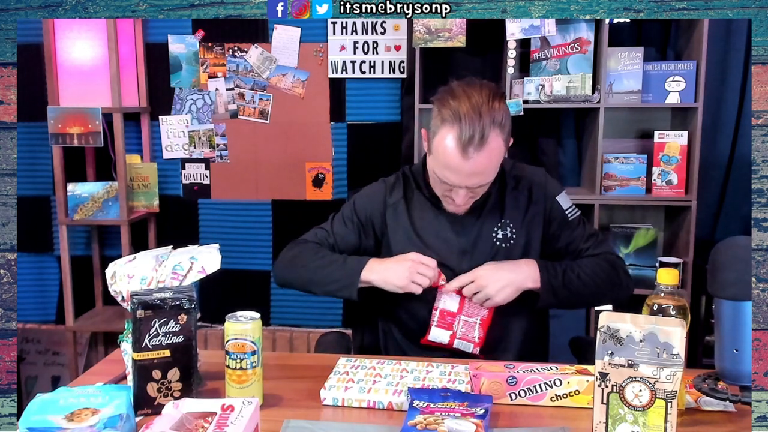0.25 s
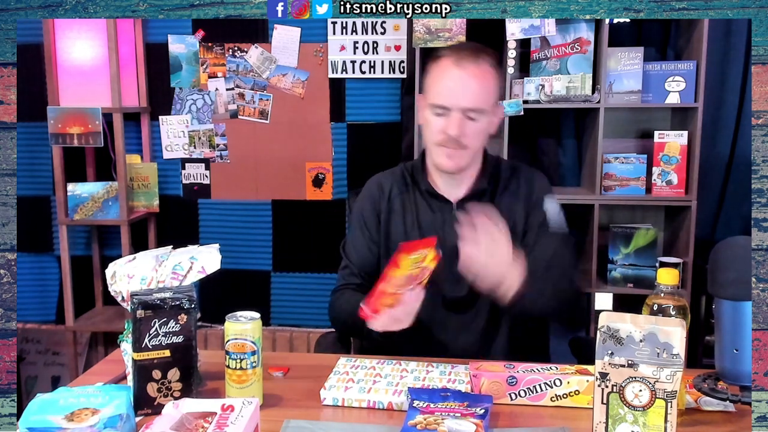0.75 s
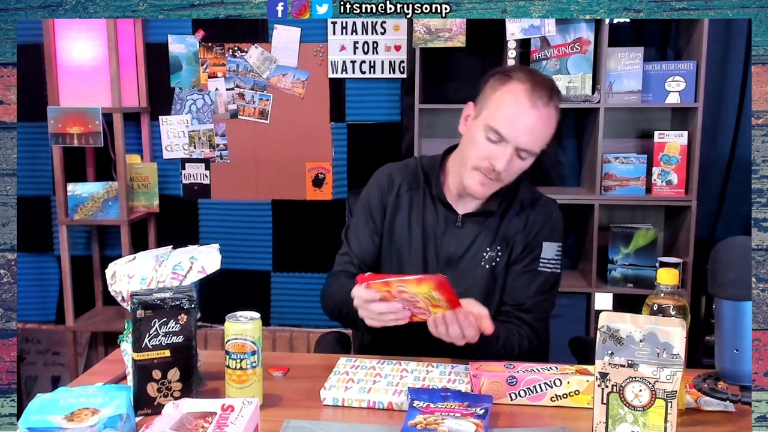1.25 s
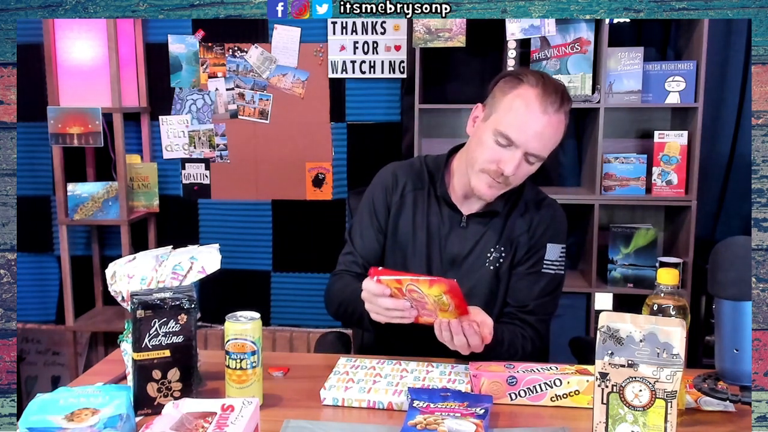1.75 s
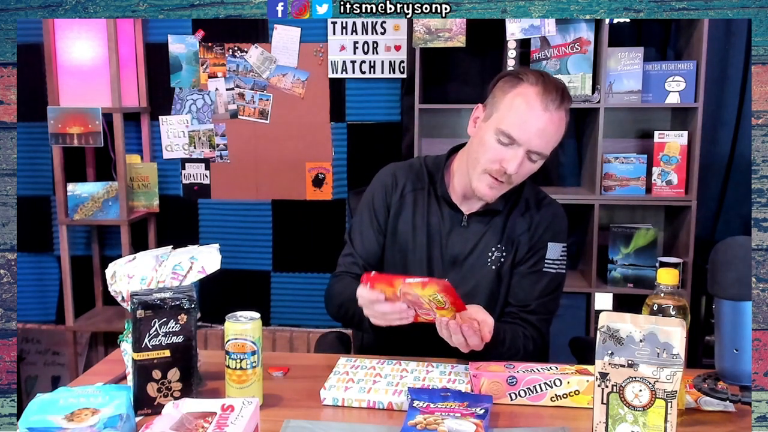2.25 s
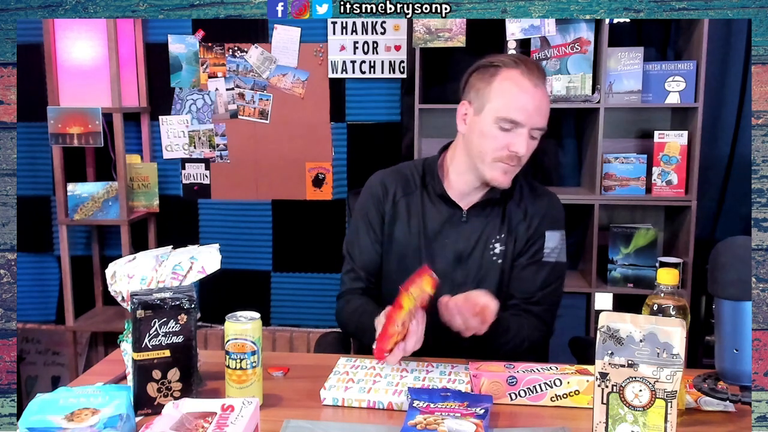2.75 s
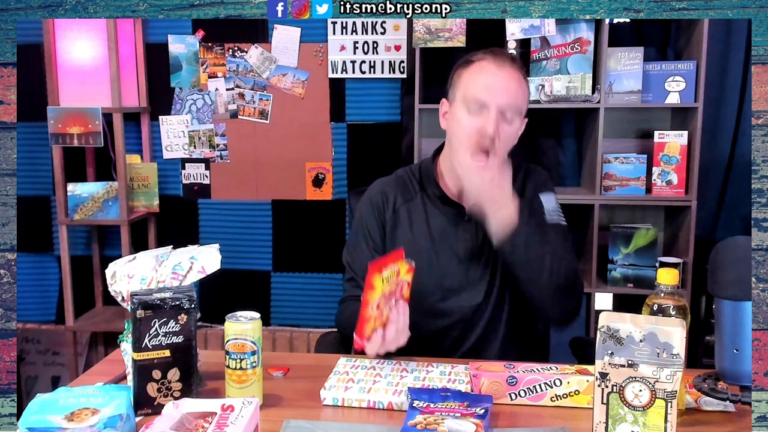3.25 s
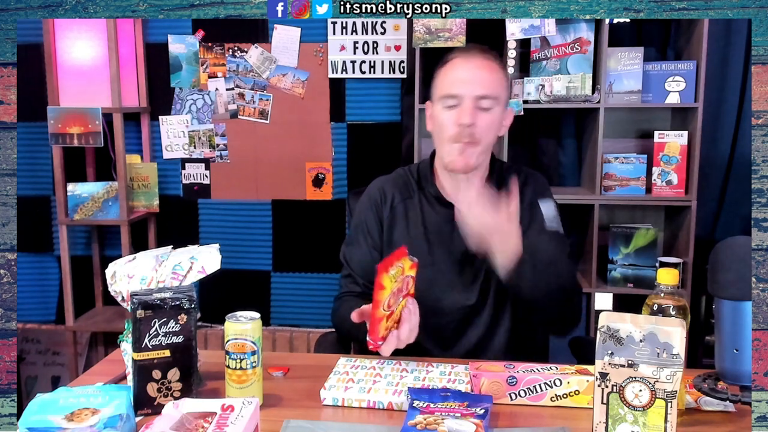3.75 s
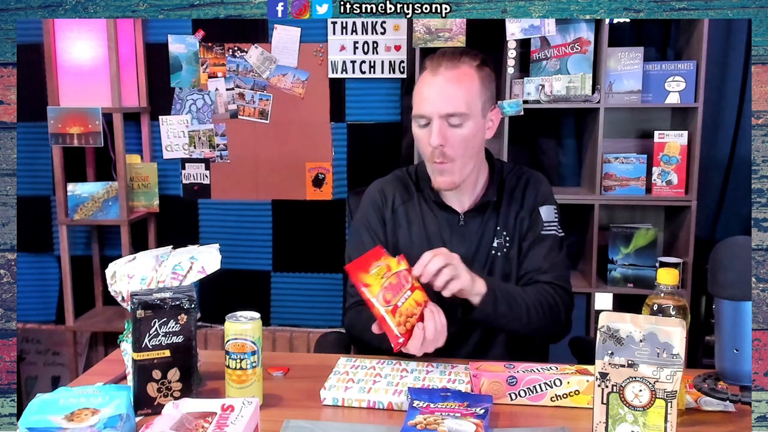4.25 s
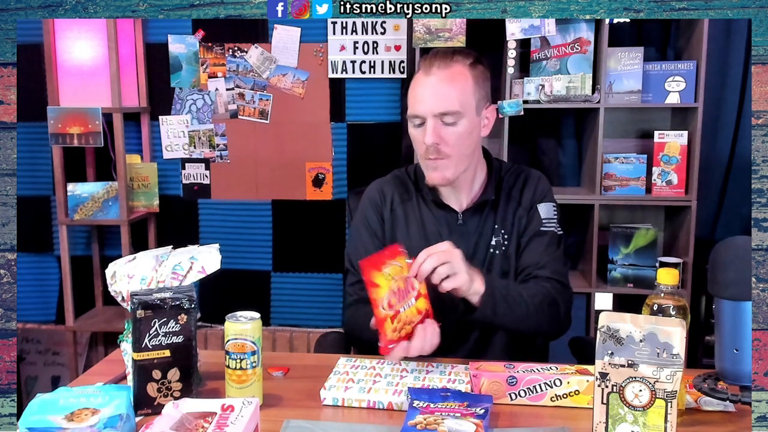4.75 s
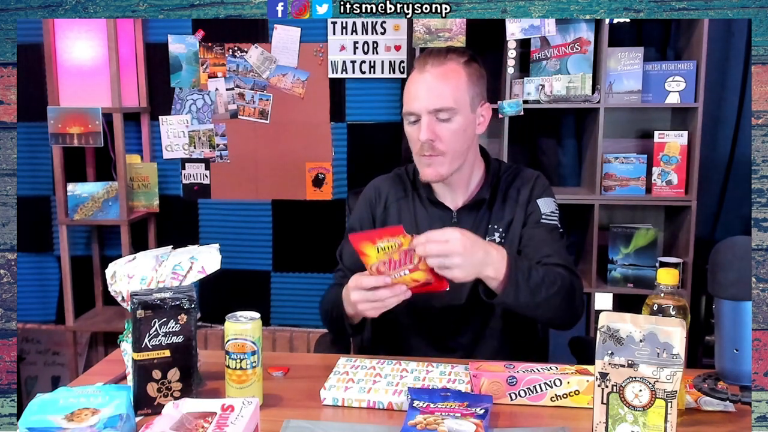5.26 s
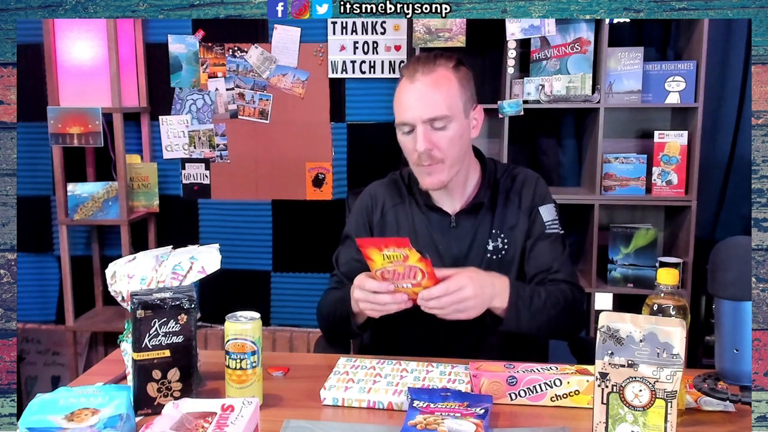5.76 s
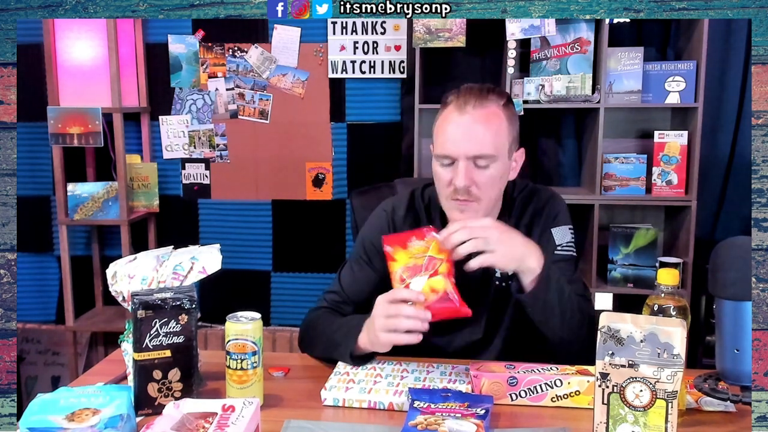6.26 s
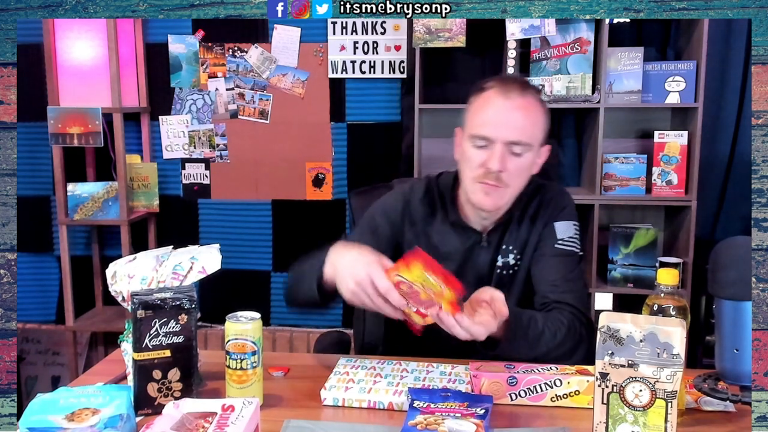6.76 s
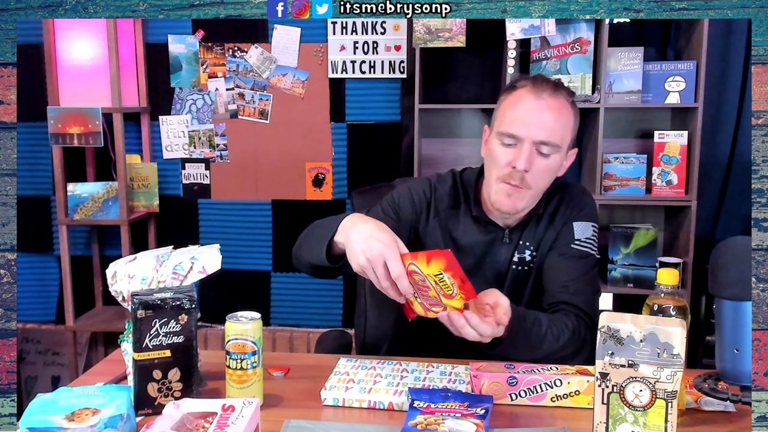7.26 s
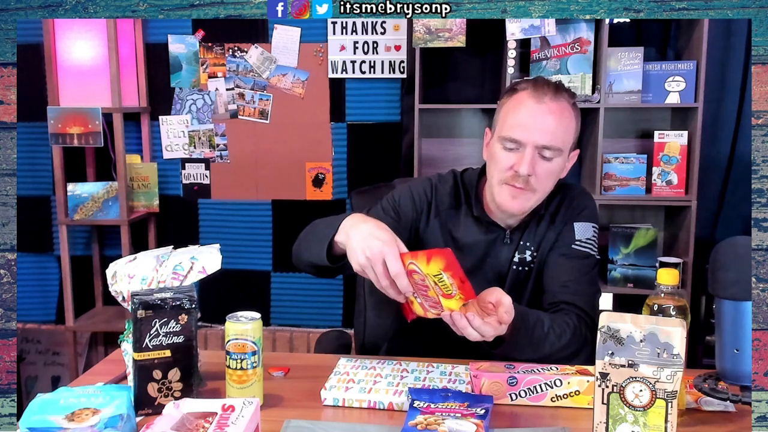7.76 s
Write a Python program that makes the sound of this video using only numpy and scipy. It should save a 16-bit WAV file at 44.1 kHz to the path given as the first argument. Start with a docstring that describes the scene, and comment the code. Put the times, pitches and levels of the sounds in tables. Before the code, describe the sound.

Plastic-foil packet crinkles sharply in the hands, with a loud cluster of snaps midway, quieter lulls, then busy rustling in a quiet room.

```python
"""At a table in a padded room, a plastic-foil snack bag is pulled open, tipped and handled.
Creases buckle with sharp snaps (a noise crack and a ringing panel) over a rustle of countless ticks
that follows the squeezes of the hand. The seal squeaks in gliding tones, the bag's air knocks in short
decaying sines, and its hollow rings in filtered noise. Sines of mains hum and a fan, with noise
for hiss and rumble, lie beneath; the sound drops out twice for an instant."""
import sys
import numpy as np
from scipy import signal
from scipy.fft import rfft, irfft
from scipy.io import wavfile
from scipy.ndimage import uniform_filter1d

SR = 44100
rng = np.random.default_rng(int(sys.argv[2]) if len(sys.argv) > 2 else 0)


def log_audio(samples):
    """Write samples as a 16-bit WAV file to the path given in sys.argv[1]."""
    # one column per channel
    frames = np.atleast_2d(samples).T
    # limit to full scale, then quantise
    limited = np.clip(frames, -1, 1)
    pcm = np.round(limited * 32767).astype(np.int16)
    wavfile.write(sys.argv[1], SR, pcm)


N = 352800  # samples, 8 s

# Colour of the crackling foil. Each row: frequency in Hz, relative density in dB per Hz.
FOIL_COLOUR = [(88, -30.5), (150, 8), (356, 5.5), (1120, 0), (1820, -1), (2450, 1.5), (4330, 0),
               (5070, -0.5), (5700, 0), (8300, -2), (10000, -9.5), (15500, -12.5), (16150, -32)]


def snaps():
    """A crease flips: a wide crack with the colour of the foil, and a brief fuzzy ring of the panel."""
    # Loud bucklings. Each row: start in seconds, peak in dB, t60 in seconds (held to .004-.06 below),
    # brightness in dB per octave, ring of the freed panel in Hz, ring against the crack in dB.
    snap_rows = [(.0073,-31.5,.018,3,1808,-6), (.0501,-15.5,.0046,-1.5,5380,3.5),
                 (.0571,-19,.009,1,5860,-1.5), (.0838,-23,.0071,-3,3510,5), (.0986,-16,.011,-1.5,5360,-4.5),
                 (.1427,-41,.0075,-2,2220,5), (.2312,-22,.0085,-5,1720,-11), (.2805,-31,.027,-3.5,1730,-5),
                 (.3059,-36.5,.0079,-10,1700,2), (.3253,-43,.0089,-10,6115,0), (.3554,-41,.0055,3.5,6804,8),
                 (.4497,-28.5,.01,-1,1970,-4.5), (.4673,-29.5,.006,3,8700,-4),
                 (.4814,-25.5,.0076,2,3420,-7), (.4975,-34,.0067,-1,1894,-6), (.5555,-35,.011,10,3770,2),
                 (.5687,-28,.0093,3,1600,15), (.6042,-33,.0092,-8.5,1580,-2),
                 (.6328,-19.5,.006,1.5,6140,-4), (.7246,-28,.0094,1,3820,-3), (.7407,-18.5,.01,0,6416,-7),
                 (.7571,-31,.016,2,1765,4), (.8437,-32,.0052,1,2930,6), (.9534,-38,.008,2,4800,0),
                 (.995,-33,.0063,5,6933,0), (1.061,-34,.012,-1,2500,0), (1.126,-36,.012,2,7070,-6),
                 (1.1743,-27.5,.0094,-.5,6503,-12), (1.3645,-35,.015,-5,5770,-8),
                 (1.4679,-22,.01,-7.5,3240,-2), (1.5074,-28.5,.008,0,2454,-4), (1.5351,-35,.01,1,5590,-4),
                 (1.7752,-39.5,.021,1,6201,-13), (1.8246,-31,.012,-5,1950,-2),
                 (1.8575,-21.5,.012,-1,6840,-12), (1.9177,-29,.016,2,7240,-7), (1.9333,-25,.0092,4,1507,10),
                 (2.0316,-33,.012,12,4780,-4), (2.0674,-36,.014,-6.5,4435,-11), (2.0788,-37,.008,6,7440,-6),
                 (2.1703,-30.5,.024,-3.5,2110,-7), (2.237,-32.5,.019,5,2260,-7),
                 (2.2902,-40,.014,11,6287,-15), (2.3408,-32,.0073,2,1248,6), (2.3612,-37.5,.011,-1,1370,10),
                 (2.466,-46.5,.0064,0,3057,2), (2.5178,-44,.0066,-2.5,2928,-4), (2.542,-42,.0065,3,3170,5),
                 (2.5797,-34.5,.014,-2.5,4300,-7), (2.746,-32,.0063,-1.5,5555,1),
                 (2.7918,-34.5,.012,5.5,7150,-6), (2.949,-33.5,.0097,.5,6200,-4),
                 (3.0391,-35,.0035,1,5297,-8), (3.0513,-35.5,.0032,4,5100,2),
                 (3.091,-42,.023,-2.5,3574,-23), (3.1465,-35,.006,8,12500,-2),
                 (3.2266,-44.5,.0091,1.5,8441,1), (3.2476,-44,.0051,1,7407,-5),
                 (3.3793,-44.5,.012,-2,3720,-1), (3.4018,-41.5,.015,-3.5,4550,-10),
                 (3.4767,-38.5,.0035,1.5,1950,5), (3.5155,-43,.008,0,3100,0), (3.674,-29.5,.013,0,6900,-12),
                 (3.691,-35,.024,9,5986,-5), (3.7812,-31.5,.02,-5,4500,-10),
                 (3.9065,-15.5,.0087,-3,4950,-4.5), (3.9656,-26.5,.02,-3.5,4650,-7.5),
                 (3.999,-31,.023,-4,1000,-6), (4.185,-26,.021,-4,6029,-10), (4.2469,-27.5,.022,-6,1780,5),
                 (4.2647,-18.5,.0088,.5,7700,-9), (4.281,-16,.01,4,2250,0), (4.2905,-20,.0084,2,3789,-7),
                 (4.3024,-18.5,.015,-5.5,2497,-6), (4.3138,-24.5,.014,.5,7700,-9),
                 (4.3975,-33,.016,-2,4823,0), (4.5561,-21,.015,-2.5,2160,5), (4.5614,-24,.007,5,3460,4),
                 (4.5848,-30,.039,-1,1800,8), (4.6143,-19,.0084,-2,2750,1),
                 (4.6654,-5.5,.0044,-1,5770,-8.5), (4.6772,-16,.022,0,4306,-3),
                 (4.6964,-22,.011,-1,5230,-9), (4.73,-9.5,.0048,-3.5,6080,1), (4.7482,-19,.008,2,8350,-6),
                 (4.759,-22,.006,-5,7150,3), (4.7912,-28,.006,2.5,5900,7), (4.8083,-21,.012,-1,1880,-2),
                 (4.843,-24.5,.011,-3.5,2325,-8), (4.8647,-35,.0048,4,7795,-2),
                 (4.8768,-23.5,.028,-4,2280,-13), (4.884,-24,.013,-4,1808,-11), (5.0909,-43,.02,1,1820,2),
                 (5.3887,-27,.0062,-3,6976,-14), (5.3995,-24,.0086,-7.5,2980,.5),
                 (5.4103,-27,.013,-3,7660,-11.5), (5.425,-33,.018,-1,7105,-5),
                 (5.5825,-47,.033,-4,7622,-10), (5.67,-36.5,.031,.5,7500,-19),
                 (5.7862,-44.5,.015,-2.5,3531,-10), (5.9072,-37,.0085,0,3100,12),
                 (5.922,-41,.029,-7,1400,-7), (6.0036,-49.5,.0046,6.5,7950,1), (6.031,-50,.015,-10,1150,6),
                 (6.1385,-49,.012,0,1820,10), (6.1905,-38,.022,-3,1400,3), (6.207,-48,.008,2,6000,-4),
                 (6.274,-38.5,.01,0,7450,-9), (6.293,-40,.022,0,4850,-4), (6.3197,-36,.012,-2,1600,2),
                 (6.3325,-36,.012,-5,2282,3), (6.3694,-37.5,.013,2,7105,-4), (6.395,-40,.012,-2,1500,2),
                 (6.4174,-39,.012,0,6190,-5), (6.429,-35,.021,-3,1550,0), (6.4534,-35,.015,3,2670,2),
                 (6.5127,-38,.012,-2,5620,-5), (6.604,-37,.012,-5,1300,0), (6.6208,-31,.012,-8,1981,-7),
                 (6.706,-42.5,.034,-11,2153,-11), (6.7868,-27.5,.012,-5,1500,-10),
                 (6.835,-37,.01,-4,1300,5), (6.8465,-39,.008,2,5030,4), (6.886,-38,.01,0,4500,-3),
                 (6.906,-39,.008,2,5000,-5), (6.92,-39,.01,0,4000,-2), (6.9542,-34,.012,0,8060,-8),
                 (6.986,-35,.015,-3,1400,3), (7.0115,-34,.025,0,1400,10), (7.0181,-31,.012,3,12300,-4),
                 (7.046,-34,.025,4,1470,8), (7.053,-32,.01,3,6850,-6), (7.082,-25.5,.025,-4.5,3820,-5),
                 (7.0994,-29,.016,4,6640,-4), (7.107,-32,.015,-4,1200,8), (7.1428,-28,.018,28,1400,-7),
                 (7.1756,-34,.0078,-1,4134,7), (7.196,-43,.01,4,7680,-5), (7.207,-36,.019,0,1550,8),
                 (7.2387,-42,.015,1,6870,-8), (7.2682,-45,.008,5,6660,-8), (7.2861,-41,.015,-2,1200,4),
                 (7.3005,-31,.018,-6,870,8), (7.3096,-41,.008,8,10500,-3), (7.35,-42,.008,3,5970,-6),
                 (7.3739,-41,.01,2,3000,-2), (7.3934,-39,.012,6,11000,-4), (7.4197,-27,.014,-3,3500,-1),
                 (7.4453,-28,.008,3,4091,-8), (7.4565,-27.5,.0082,-4,1765,2), (7.4657,-33,.015,2,1400,2),
                 (7.5127,-14,.016,2,1490,-4), (7.5377,-29,.012,7,7360,-12), (7.607,-26.5,.015,-1,7340,-9),
                 (7.6191,-21,.0035,-8.5,1360,-10.5), (7.643,-31,.048,-3,4091,-8),
                 (7.6507,-29.5,.015,13,7364,-13), (7.662,-33,.006,5,10000,-2), (7.7211,-38,.015,0,1500,0),
                 (7.7595,-32,.029,1,1981,0), (7.8028,-39,.012,-5,1636,-2), (7.812,-40,.025,-4,2500,2),
                 (7.8743,-46,.008,6,6080,-2), (7.8948,-41,.005,14,11500,0), (7.977,-38,.015,-6,1300,2),
                 (7.985,-30.5,.023,-8,1400,3)]
    s, db, t60, tilt_db, ring_hz, ring_db = np.transpose(snap_rows)[:, :, None]
    t = np.arange(2048) / SR
    hz = np.fft.rfftfreq(2048, 1 / SR) + 1
    noise = rfft(rng.standard_normal((len(s), 2, len(t))))

    octaves = np.log2(np.clip(hz, 700, 9000) / 3000)
    colour = gain_of(read(FOIL_COLOUR, hz) + tilt_db * octaves)
    narrow = 1 / (1 + ((hz - ring_hz) / (0.05 * ring_hz + 150)) ** 2)

    t60 = np.clip(t60, .004, .06)
    rise = np.minimum(t / (0.06 * t60), 1)  # long creases also start slower
    fall_db = -60 * t / t60

    burst = rfft(irfft(noise[:, 0]) * rise * gain_of(fall_db))
    # every band takes part in the crack
    burst = burst / np.sqrt(uniform_filter1d(abs(burst) ** 2, size=60, axis=1))
    crack = irfft(burst * colour) * (fall_db > -60)
    crack = peaked(band(crack, 1100, 17000))
    ring = peaked(irfft(noise[:, 1] * narrow) * rise * gain_of(1.11 * fall_db))  # fades a little faster
    return placed(s, gain_of(db) * peaked(crack + gain_of(ring_db) * ring))


def rustle():
    """Dense small ticks, dull and bright, sparse pops and the air in the bag, all following the hands."""
    # The hollow of the bag colours the rustle as it is turned. Each row: time in seconds,
    # resonance in Hz (before its wander), its share in dB, low flutter of the bag air in dB.
    hollow_rows = [(0.0, 1710, -5.5, -4), (0.82, 1700, -6, 0), (1.09, 2210, -5, -2), (2.1, 1700, -8, -3),
                   (2.45, 1400, 0, 3), (2.6, 2120, -12, 1), (2.94, 2600, -5, 3), (3.25, 1760, -11, 6),
                   (3.39, 2050, -5, -.5), (3.9, 2120, -4, 2.5), (4.3, 2100, -4, 0.5), (5.03, 1850, .5, 3),
                   (5.75, 2120, -4, 0), (5.9, 1500, 0, 2), (6.35, 1720, -4, 0), (6.91, 1470, -3, 0),
                   (8.0, 1440, -4.5, -1)]
    hollow_hz, hollow_db, air_db = curves(hollow_rows)
    body, treble = handling()

    # one crease sets off its neighbours
    clump = gain_of(3.0 * evened(uniform_filter1d(rng.standard_normal(N), 350)))
    # the bag never holds its shape
    drift = uniform_filter1d(uniform_filter1d(rng.standard_normal(N), 2000), 2000)
    wander = np.exp(0.13 * evened(drift))

    dull = ticks(clump, per_s=2200., spread_db=3.2, lo_hz=900, hi_hz=4550, cycles=23.0, wide=1.63)
    dull_pops = ticks(clump, per_s=120., spread_db=4.5, lo_hz=880, hi_hz=7500, cycles=36.0, wide=1.25)
    dull += gain_of(-4.5) * dull_pops
    dull += gain_of(hollow_db) * evened(resonate(dull, hollow_hz * wander, width_hz=600))

    bright = ticks(clump, per_s=3300., spread_db=3.2, lo_hz=4700, hi_hz=13500, cycles=12.3, wide=1.79)
    bright_pops = ticks(clump, per_s=110., spread_db=3.0, lo_hz=3000, hi_hz=9000, cycles=40.0, wide=2.6)
    bright += gain_of(-4.5) * bright_pops

    air = ticks(clump, per_s=1500., spread_db=1.5, lo_hz=170, hi_hz=700, cycles=9.0, wide=1.67)
    return body * (dull + gain_of(air_db) * air) + treble * bright


def ticks(clump, per_s, spread_db, lo_hz, hi_hz, cycles, wide, count=40):
    """Random small bucklings, a few large; each frees one of count panels with its own pitch."""
    happens = rng.random(N) < clump * per_s / SR
    size = gain_of(spread_db * np.minimum(rng.exponential(1, N), 4)) * happens
    panel = rng.integers(0, count, N)
    t = np.arange(600) / SR
    out = np.zeros(N)
    for k, hz in enumerate(np.geomspace(lo_hz, hi_hz, count)):
        fading = rng.standard_normal(len(t)) * gain_of(-60 * t * hz / cycles)  # 60 dB down after cycles
        shape = band(fading, hz / wide, hz * wide)
        shape = shape / np.linalg.norm(shape) * np.sqrt(hz)
        out += signal.oaconvolve(size * (panel == k), shape)[:N]
    return evened(coloured(out, FOIL_COLOUR))


def handling():
    """How hard the hands work the foil: every squeeze swells, peaks and fades; gains of body and treble."""
    # Squeezes of the hand, each a burst of rustle. Each row: peak time in seconds, peak in dB,
    # time to swell 20 dB in seconds, time to fade 20 dB in seconds, treble against the peak in dB.
    squeeze_rows = [(0.0, -51.5, 0.619, 0.103, -2.5), (0.097, -52.0, 0.169, 0.092, -1.5),
                    (0.273, -53.0, 0.097, 0.107, -2.5), (0.469, -59.0, 0.168, 0.163, 0.5),
                    (0.601, -58.5, 0.167, 0.218, -1.0), (0.755, -50.0, 0.153, 0.09, -1.0),
                    (0.851, -57.0, 0.141, 0.299, -0.5), (1.057, -54.0, 0.308, 0.155, -0.5),
                    (1.175, -52.0, 0.127, 0.125, -1.5), (1.338, -46.5, 0.066, 0.151, 0.0),
                    (1.409, -55.0, 0.13, 0.121, 0.5), (1.519, -50.0, 0.171, 0.092, -1.0),
                    (1.618, -58.5, 0.119, 0.118, 0.0), (1.726, -58.5, 0.174, 0.098, -0.5),
                    (1.832, -50.0, 0.126, 0.155, 0.0), (1.94, -46.5, 0.121, 0.101, -0.5),
                    (2.024, -51.5, 0.106, 0.116, 1.5), (2.16, -50.5, 0.144, 0.101, 1.5),
                    (2.234, -57.0, 0.101, 0.188, 1.5), (2.342, -61.5, 0.109, 0.192, -1.0),
                    (2.595, -63.5, 0.112, 0.128, -1.0), (2.775, -52.0, 0.2, 0.2, -2.0),
                    (2.85, -52.5, 0.2, 0.16, -2.0), (3.147, -69.5, 0.308, 0.242, -0.5),
                    (3.488, -66.0, 0.284, 0.183, 0.0), (3.617, -56.5, 0.144, 0.099, 0.0),
                    (3.691, -55.0, 0.07, 0.074, -3.0), (3.923, -49.5, 0.171, 0.131, -1.0),
                    (3.988, -51.5, 0.125, 0.161, -0.5), (4.196, -57.0, 0.227, 0.119, -3.5),
                    (4.298, -48.0, 0.081, 0.075, -6.0), (4.385, -59.0, 0.132, 0.136, -3.0),
                    (4.569, -47.0, 0.033, 0.163, -0.5), (4.676, -46.0, 0.043, 0.102, 0.5),
                    (4.745, -47.0, 0.083, 0.121, 1.5), (4.823, -49.0, 0.119, 0.12, 0.0),
                    (4.892, -54.5, 0.119, 0.098, 0.5), (5.082, -60.5, 0.214, 0.253, 1.0),
                    (5.302, -65.5, 0.218, 0.207, -3.0), (5.399, -51.0, 0.044, 0.136, -2.0),
                    (5.675, -61.0, 0.034, 0.066, 0.5), (5.799, -69.5, 0.079, 0.25, -2.5),
                    (5.926, -63.5, 0.29, 0.12, -5.5), (6.199, -66.0, 0.126, 0.088, -4.0),
                    (6.332, -50.0, 0.079, 0.093, -2.5), (6.477, -48.0, 0.101, 0.198, -4.0),
                    (6.624, -51.0, 0.122, 0.05, -4.5), (6.807, -50.5, 0.116, 0.202, -1.0),
                    (6.994, -50.0, 0.148, 0.202, 0.0), (7.094, -45.5, 0.246, 0.102, 0.0),
                    (7.137, -54.0, 0.111, 0.18, -0.5), (7.302, -60.0, 0.107, 0.108, -0.5),
                    (7.459, -48.5, 0.188, 0.092, -1.0), (7.533, -48.0, 0.089, 0.139, 0.5),
                    (7.62, -46.0, 0.113, 0.166, -2.0), (7.744, -56.0, 0.154, 0.111, -2.0),
                    (7.812, -58.0, 0.108, 0.107, -3.5), (7.999, -57.5, 0.226, 0.188, -3.5)]
    resting_db = -83  # rustle of the bag held still
    s, db, swell_s, fade_s, treble_db = np.transpose(squeeze_rows)[:, :, None]
    t = np.arange(0, N + 64, 64) / SR  # a coarse time grid is enough
    level_db = db - 20 * np.where(t < s, (s - t) / swell_s, (t - s) / fade_s)
    gains = []
    for each_db in (level_db, level_db + treble_db):
        power = gain_of(resting_db) ** 2 + (gain_of(each_db) ** 2).sum(0)
        gains.append(np.interp(np.arange(N) / SR, t, np.sqrt(power)))
    return gains


def puffs():
    """The air in the bag is knocked: hollow sine tones that die in a few cycles."""
    # Each row: start in seconds, peak in dB, pitch in Hz, cycles to die by 60 dB.
    puff_rows = [(0.7756, -47, 190, 9), (2.0438, -47, 203, 9), (2.3396, -42, 270, 12),
                 (2.3467, -41, 420, 9), (2.3606, -43, 250, 9), (2.5797, -48, 170, 7),
                 (2.7917, -45, 500, 12), (2.8734, -47, 480, 12), (3.8862, -46, 174, 9),
                 (3.9054, -35.5, 260, 9), (3.998, -42, 317, 9), (4.2434, -38, 342, 8),
                 (4.3967, -42, 205, 9), (4.409, -45, 520, 9), (4.5632, -39, 312, 9), (4.5939, -39, 467, 9),
                 (4.6646, -38, 487, 9), (4.6773, -38, 510, 9), (4.7294, -31, 590, 9), (4.7431, -35, 580, 9),
                 (4.8432, -30.5, 337, 9), (4.877, -26.5, 330, 9), (4.9155, -40, 313, 9),
                 (4.9372, -39.5, 493, 9), (5.3994, -40, 302, 9), (6.034, -52, 350, 9),
                 (6.045, -48, 221, 16), (6.058, -50, 240, 9), (6.1925, -39, 505, 22), (6.2234, -45, 327, 9),
                 (6.4766, -44, 510, 9), (6.618, -41, 470, 9), (6.9683, -41, 301, 9), (7.0493, -41, 380, 9),
                 (7.0875, -39, 415, 9), (7.4208, -38, 342, 9), (7.5122, -32, 510, 9),
                 (7.8121, -43.5, 237, 9), (7.9841, -38, 206, 9)]
    s, db, hz, cycles = np.transpose(puff_rows)[:, :, None]
    t = np.arange(3000) / SR
    shape = np.minimum(t / 0.0017, 1) * gain_of(-60 * t * hz / cycles)
    return placed(s, gain_of(db) * peaked(shape * np.sin(2 * np.pi * hz * t)))


def squeaks():
    """The seal squeaks as it peels: thin, fluttering whistles that glide."""
    # Each row: start in seconds, length in seconds, from Hz, to Hz, level in dB before the flutter.
    squeak_rows = [(.233, .014, 14200, 5000, -48), (.537, .01, 12300, 7000, -57),
                   (.547, .017, 7000, 11500, -54), (.573, .024, 12000, 4800, -55)]
    out = np.zeros(N)
    for s, length, from_hz, to_hz, db in squeak_rows:
        at = np.arange(int(s * SR), int((s + length) * SR))
        flutter = 1 + 0.34 * evened(uniform_filter1d(rng.standard_normal(len(at)), 40))
        glide_hz = np.geomspace(from_hz, to_hz, len(at))
        tone = np.sin(2 * np.pi * np.cumsum(glide_hz) / SR)
        out[at] += gain_of(db) * flutter * tone * signal.windows.tukey(len(at), .2)
    return out


def sagging():
    """The hollow of the bag rings on and sinks as the bag sags: a fuzzy ring that glides down."""
    # One row: from seconds, to seconds, from Hz, to Hz, level in dB, change in level by the end in dB.
    sag_row = (2.365, 2.5, 1520, 1200, -60, -12)
    from_s, to_s, from_hz, to_hz, db, fade_db = sag_row
    u = (np.arange(N) / SR - from_s) / (to_s - from_s)
    progress = np.clip(u, 0, 1)
    ring = resonate(rng.standard_normal(N), from_hz + (to_hz - from_hz) * progress, width_hz=90)
    ends = np.clip(8 * np.minimum(u, 1 - u), 0, 1)  # fades in and out, silent elsewhere
    return evened(ring) * gain_of(db + fade_db * progress) * ends


def room(x):
    """Sparse reflections off the room, each band dying at its own speed."""
    # Each row: frequency in Hz, t60 in seconds.
    decay_rows = [(250, 0.091), (1500, 0.21), (5000, 0.06), (14000, 0.092)]
    taps = np.zeros(SR // 2)
    at = np.arange(130, SR // 2 - 20, 20)
    taps[at + rng.integers(0, 20, len(at))] = rng.choice([-1., 1.], len(at))
    hz, t, z = signal.stft(taps, SR, nperseg=256)
    fall = gain_of(-60 * t / read(decay_rows, hz)[:, None])
    tail = signal.istft(z * fall, SR, nperseg=256)[1]
    return signal.fftconvolve(x, tail / np.linalg.norm(tail))[:N]


def background():
    """Hiss and air as shaped noise, wavering sines of mains hum and a fan, and a deep noise rumble."""
    # Colour of hiss and air. Each row: frequency in Hz, relative density in dB per Hz.
    air_colour = [(12, -36), (20, -9), (82, 9.5), (382, -20.5), (994, -24), (2060, -36), (4050, -46),
                  (12500, -33), (15300, -37), (16300, -69)]
    # Mains hum. Each row: frequency in Hz, rms level in dB before the waver.
    hum_rows = [(59.5, -74.5), (119.8, -64), (193, -72), (239, -75), (360, -79.5), (474, -83), (597, -82)]
    # Each row: time in seconds, deep rumble through the table in dB, fan drone in dB.
    rumble_rows = [(0.0, -50, -68), (0.22, -61, -60), (0.69, -59, -64), (0.8, -44.5, -57), (1.15, -49, -62),
                   (1.5, -55, -69), (2.52, -54, -62), (2.83, -60, -59), (3.0, -57, -80), (3.8, -56, -79),
                   (3.94, -58, -64), (5.32, -57, -62), (5.64, -59, -76), (6.8, -54, -80), (6.97, -49, -53),
                   (7.29, -60, -72), (7.57, -51, -65), (8.0, -54, -80)]
    air_level_db, fan_hz = -63.5, 97.8
    t = np.arange(N) / SR
    rumble_db, fan_db = curves(rumble_rows)
    air_noise, waver_noise, rumble_noise = rng.standard_normal((3, N))

    air_gain = gain_of(read(air_colour, np.fft.rfftfreq(N, 1 / SR)))
    air = gain_of(air_level_db) * evened(irfft(rfft(air_noise) * air_gain, N))

    waver = evened(uniform_filter1d(uniform_filter1d(waver_noise, 3000), 3000))
    hum = np.zeros(N)
    for hz, db in hum_rows:
        phase = 2 * np.pi * (hz * t + rng.random()) + 0.24 * hz / 120 * waver
        hum += np.sqrt(2) * gain_of(db + 3.2 * waver) * np.sin(phase)
    # the waver run backwards sways the fan apart from the hum
    fan = np.sqrt(2) * gain_of(fan_db) * np.sin(2 * np.pi * fan_hz * t + .3 * waver[::-1])

    deep = evened(band(band(rumble_noise, 11.2, 25), 11.2, 25))
    upper = gain_of(-10) * evened(band(rumble_noise, 41, 140))
    return air + hum + fan + gain_of(rumble_db) * (deep + upper)


def gain_of(db):
    """Decibels to a factor."""
    return 10 ** (np.asarray(db) / 20)


def evened(x):
    """Scales to rms 1."""
    return x / np.sqrt(np.mean(x ** 2) + 1e-20)


def peaked(x):
    """Scales each row to peak 1."""
    return x / abs(x).max(axis=-1, keepdims=True)


def read(points, hz):
    """A spectrum table on a log-frequency axis."""
    f, value = np.transpose(points)
    return np.interp(np.log(hz + 1), np.log(f + 1), value)


def curves(rows):
    """Every column of a table after the time, sample by sample."""
    s, *columns = np.transpose(rows)
    return [np.interp(np.arange(N) / SR, s, c) for c in columns]


def placed(s, sounds):
    """Lays one sound a row at its time."""
    out = np.zeros(N + sounds.shape[1])
    np.add.at(out, (s * SR).astype(int) + np.arange(sounds.shape[1]), sounds)
    return out[:N]


def band(x, lo_hz, hi_hz):
    """Causal band-pass along the last axis."""
    sos = signal.butter(2, [lo_hz, min(hi_hz, .45 * SR)], "bandpass", fs=SR, output="sos")
    return signal.sosfilt(sos, x)


def coloured(x, points):
    """Causal filter with the given spectrum (minimum phase)."""
    log_gain = np.log(gain_of(read(points, abs(np.fft.fftfreq(4096, 1 / SR)))))
    taps = np.fft.ifft(np.exp(log_gain - 1j * signal.hilbert(log_gain).imag)).real[:2048]
    return signal.oaconvolve(x, taps)[:len(x)]


def resonate(x, hz, width_hz):
    """A moving resonance: shifts the curve hz down to zero, smooths, and shifts back."""
    turn = np.exp(2j * np.pi * np.cumsum(hz) / SR)
    r = np.exp(-np.pi * width_hz / SR)
    return (turn * signal.lfilter([1 - r], [1, -r], x / turn)).real


def scene():
    """The bag close by, a little of the room, and the background."""
    bag = snaps() + puffs() + squeaks() + sagging() + rustle()
    return (bag + gain_of(-16.5) * room(bag) + background())[None]


def record(dry):
    """Two instants of silence, then the band limit."""
    # Each row: from seconds, to seconds.
    dropout_rows = [(.7722, .7773), (6.1105, 6.116)]
    edge_hz = 16800
    t = np.arange(N) / SR
    silent = sum((t > a) & (t < b) for a, b in dropout_rows)
    on = uniform_filter1d(1. - silent, 15)  # softened edges
    low_pass = signal.firwin(511, edge_hz, window=("kaiser", 9), fs=SR)
    return signal.oaconvolve(dry * on, low_pass[None], "same")


dry = scene()
out = record(dry)
log_audio(out)
```